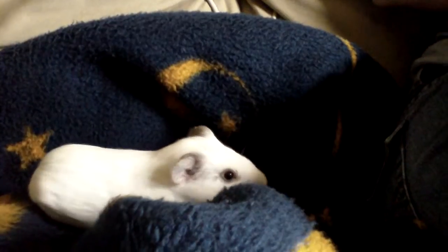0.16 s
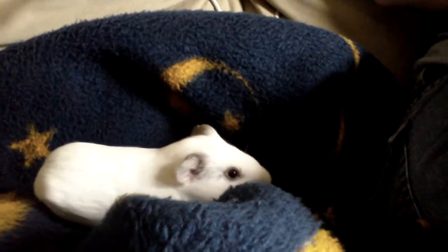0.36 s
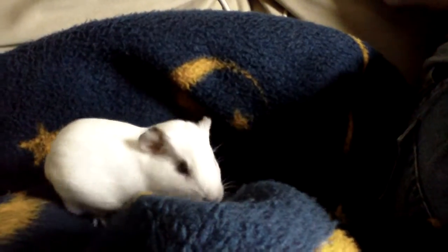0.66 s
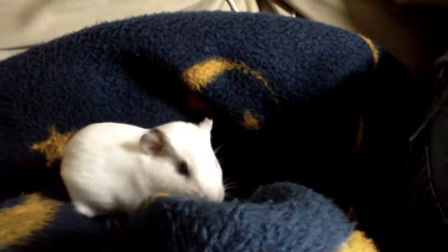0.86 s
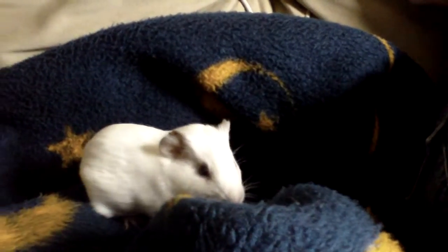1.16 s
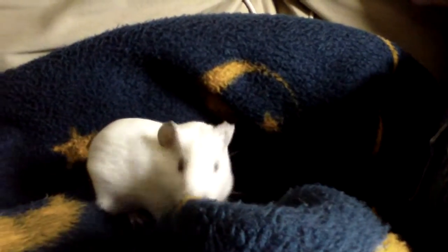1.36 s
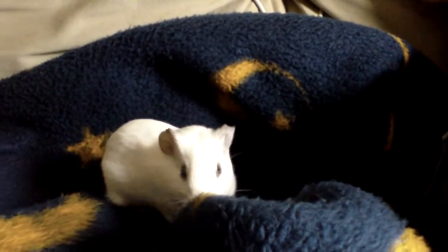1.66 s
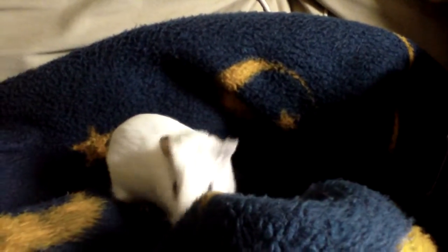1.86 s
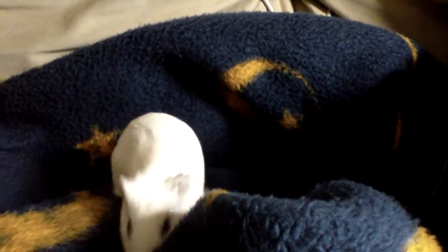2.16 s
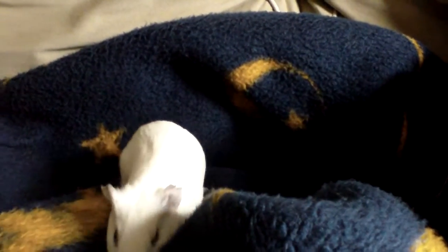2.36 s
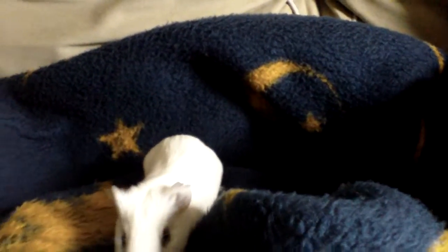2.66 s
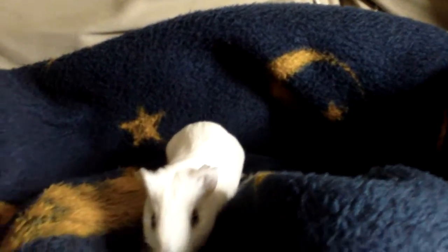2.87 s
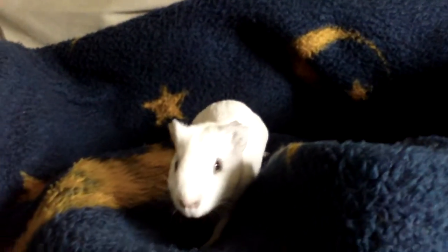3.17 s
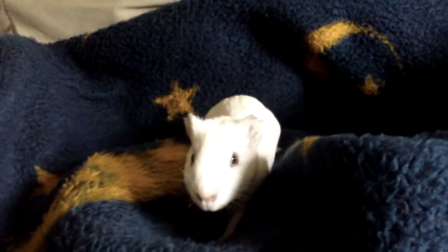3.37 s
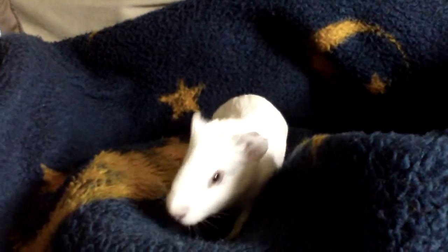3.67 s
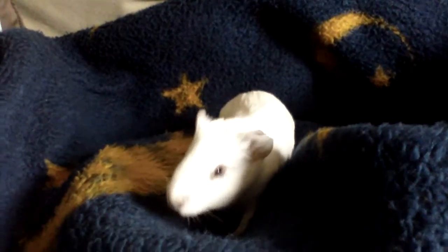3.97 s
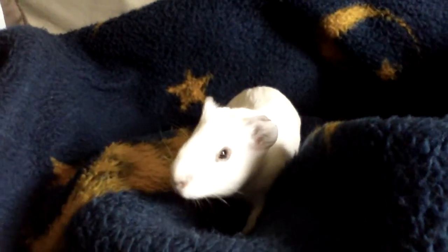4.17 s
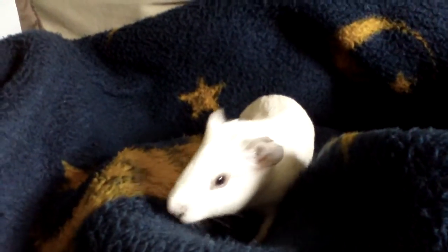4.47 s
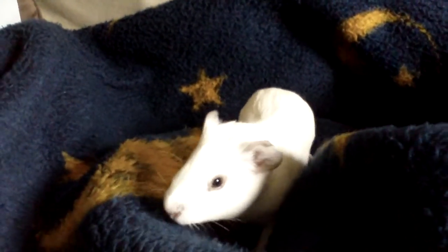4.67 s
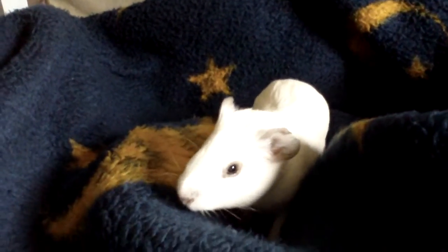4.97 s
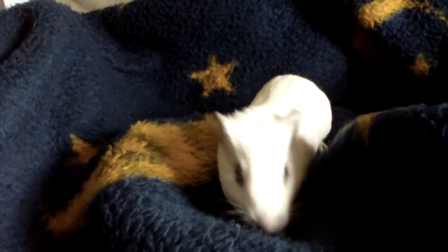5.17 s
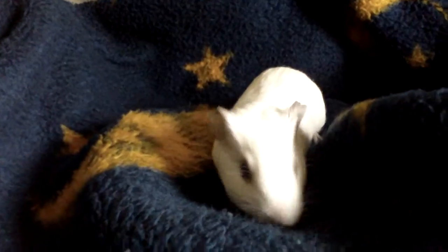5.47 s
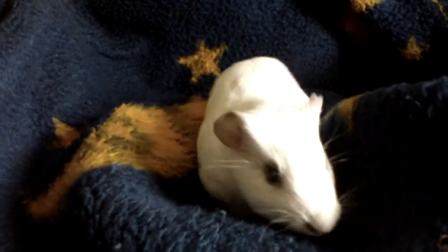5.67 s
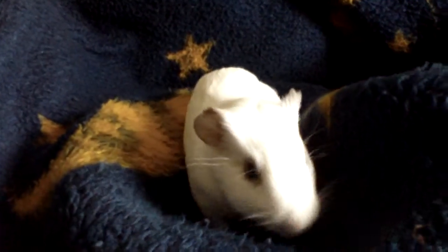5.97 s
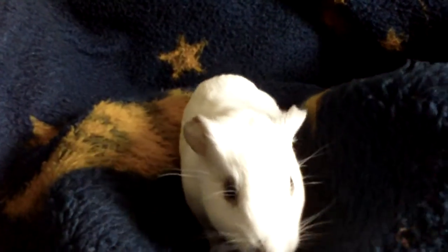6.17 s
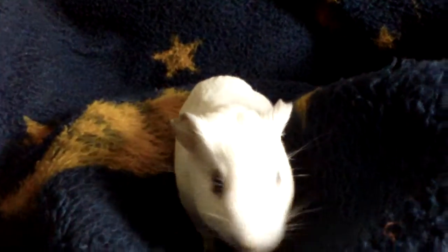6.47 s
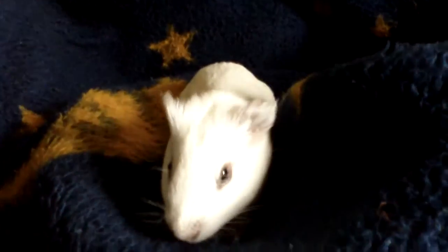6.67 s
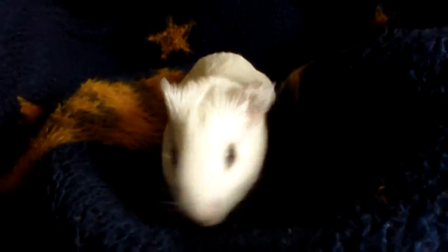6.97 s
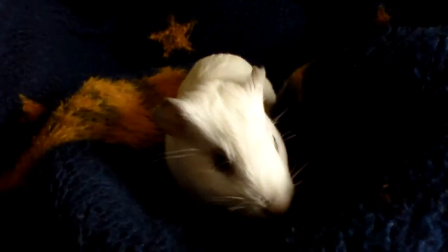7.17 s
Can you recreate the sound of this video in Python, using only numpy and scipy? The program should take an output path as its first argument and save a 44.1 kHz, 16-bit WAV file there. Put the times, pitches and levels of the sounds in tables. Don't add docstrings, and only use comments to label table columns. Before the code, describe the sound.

A guinea pig chirps softly on a fleece in a quiet room, while cloth scuffs and sharp knocks sound on the camera case midway.

```python
import sys
import numpy as np
from scipy import signal
from scipy.fft import rfft, irfft, next_fast_len
from scipy.io import wavfile
from scipy.ndimage import uniform_filter1d, map_coordinates

SR = 44100
rng = np.random.default_rng(int(sys.argv[2]) if len(sys.argv) > 2 else 0)


def convert_level_to_amplitude(level_db):
    exponent = np.asarray(level_db, float) / 20
    return 10 ** exponent


def unload_wav(signal):
    wavfile.write(
        sys.argv[1],
        SR,
        np.round(np.clip(np.atleast_2d(signal).T, -1, 1) * 32767).astype(np.int16),
    )


N = 322355

# pitch_hz, width_hz, level_db
LOW_SHELL = [(1086, 238, 1), (2137, 255, -2), (3160, 510, -4.5)]
# pitch_hz, width_hz, level_db
HIGH_SHELL = [(1697, 440, 9), (3396, 310, -4)]
# pitch_hz, level_db (per Hz)
LOOSE_PARTS = [(120, -47), (200, -5.5), (696, -3), (1040, -4), (1570, 2), (2130, 1), (2650, -12),
               (3350, -5), (5260, -15), (7830, -14.5), (8880, -20), (9900, -18), (15000, -43)]


def unit(x):
    return x / np.sqrt(np.mean(x ** 2) + 1e-20)


def along(points, hz):
    f, v = np.transpose(points)
    return np.interp(np.log(hz + 1), np.log(f + 1), v)


def wobble(rate):
    knots = rng.standard_normal(int(N * rate / SR) + 4)
    return map_coordinates(knots, [np.arange(N) * rate / SR])


def filtered(x, response):
    m = next_fast_len(N + 8192)
    return irfft(rfft(x, m) * response(np.fft.rfftfreq(m, 1 / SR)), m)[..., :N]


def span(first_s, last_s):
    at = np.arange(round(first_s * SR), min(round(last_s * SR), N))
    nearest_end = np.minimum(at - at[0], at[-1] - at)
    return at, np.minimum(1, nearest_end / (0.0025 * SR))


def room():
    # pitch_hz, level_db (per Hz)
    hush_curve = [(30, -23), (60, -18.5), (100, -16), (160, -6), (300, -2), (480, 0), (1100, 3), (1500, -2),
                  (3200, -5.5), (5000, -9.5), (6500, -6), (8700, -10.5), (9400, -13.5), (15500, -16)]
    # pitch_hz, likeness (1 = the same)
    alike = [(60, 0.99), (250, 1), (640, 0.93), (1400, 0.91), (3100, 0.71), (8000, 0.91), (15000, 0.41)]
    tone_hz = [242.4, 484, 7867, 12408]
    # level_db (rms), phase_wander_turns
    tones = [
        (-75.5, 0.13),
        (-79, 0.5),
        (-64.5, .02),
        (-84, 0.022),
    ]

    def mid_and_side(hz):
        turn = np.arccos(np.clip(along(alike, hz), -1, 1)) / 2
        return convert_level_to_amplitude(along(hush_curve, hz)) * np.array([np.cos(turn), np.sin(turn)])

    mid, side = filtered(rng.standard_normal((2, N)), mid_and_side)
    hush_db = -60.5 + 0.35 * wobble(1.29) + 0.28 * wobble(12)
    out = convert_level_to_amplitude(hush_db) * unit(np.array([mid + side, mid - side]))
    t = np.arange(N) / SR
    for hz, (db, wander) in zip(tone_hz, tones):
        level = np.sqrt(2) * convert_level_to_amplitude(db + 0.26 * wobble(2.96))
        out = out + level * np.sin(2 * np.pi * (hz * t + wander * wobble(6)))
    return out


def voice(at, hz, level, effort_db, tremor, flutter):
    # pitch_hz, level_db
    throat = [(650, -5), (850, 1), (1100, 1), (1400, 7.5), (1620, 3.5), (1800, -8), (2350, -0.5),
              (3400, -8.5)]
    partials_db = [0, -8, -10, -10]
    # time_s, level_db
    facing = [(2, -4), (5.6, 0.5)]
    phase = 2 * np.pi * np.cumsum(hz * (1 + 0.01 * tremor[at])) / SR
    facing_db = np.interp(at[0] / SR, *np.transpose(facing))
    effort_lift_db = 0.97 * (effort_db + 58.5)
    lift_db = [0, effort_lift_db, effort_lift_db + facing_db, effort_lift_db + facing_db]
    tone = np.zeros(len(at))
    for k, db in enumerate(partials_db):
        partial_db = db + lift_db[k] + along(throat, (k + 1) * hz)
        tone -= convert_level_to_amplitude(partial_db) * np.cos((k + 1) * phase)
    return np.sqrt(2) * level * convert_level_to_amplitude(1.5 * flutter[at]) * tone


def rodent():
    # start_s, length_s, first_pitch_hz, last_pitch_hz, level_db
    chirps = [(0.0, 0.026, 713, 716, -57.5), (0.509, 0.057, 643, 930, -61), (1.063, 0.078, 733, 770, -60),
              (1.384, .052, 697, 1010, -61.5), (1.46, .018, 1060, 1100, -60),
              (1.474, 0.025, 1080, 1076, -58), (1.657, 0.045, 746, 790, -66.5),
              (1.903, .024, 790, 795, -61), (1.93, 0.041, 762, 760, -63), (5.201, 0.046, 750, 1003, -60.5),
              (5.64, .025, 810, 910, -64), (6.221, 0.0386, 698, 825, -57), (6.631, .022, 760, 780, -65)]
    # time_s, pitch_hz, effort_db
    long_calls = [
        [(0.16, 662, -61), (0.188, 742, -56.5), (0.22, 740, -56.5), (0.234, 802, -55), (0.246, 837, -62.5),
         (0.282, 760, -56.5), (0.292, 770, -76)],
        [(0.745, 705, -55.5), (0.773, 815, -58), (0.807, 901, -58), (0.839, 1097, -63), (0.857, 1440, -58),
         (0.883, 1290, -57.5), (0.91, 1650, -62)],
        [(5.817, 780, -60), (5.831, 718, -56.5), (5.841, 735, -56.5), (5.856, 815, -56), (5.866, 830, -58),
         (5.875, 840, -66)],
    ]
    attack_s, release_s = 0.0069, 0.01
    glide_bend = 1.52
    hook_hz, hook_s = 30, 0.0044
    out, tremor, flutter = np.zeros(N), wobble(90), wobble(110)
    for s, length, first_hz, last_hz, db in chirps:
        at, _ = span(s, s + length)
        t = (at - at[0]) / SR
        rise = t / attack_s + (s == 0)
        swell = np.clip(np.minimum(rise, (length - t) / release_s), 0, 1)
        glide_hz = first_hz + (last_hz - first_hz) * (t / length) ** glide_bend
        hz = glide_hz + hook_hz * np.exp(-t / hook_s)
        out[at] += voice(at, hz, convert_level_to_amplitude(db) * swell, db, tremor, flutter)
    for s, hz, db in map(np.transpose, long_calls):
        at, fade = span(s[0], s[-1])
        level = fade * convert_level_to_amplitude(np.interp(at / SR, s, db))
        out[at] += voice(at, np.interp(at / SR, s, hz), level, np.median(db), tremor, flutter)
    return out


def shell(modes):
    def response(f):
        total = 0
        for k, (centre, width, db) in enumerate(modes):
            drive = 1j * f * width
            total = total + (-1) ** k * convert_level_to_amplitude(db) * drive / (centre * centre - f * f + drive)
        return total
    return response


def fibres(lumpy_db):
    return rng.standard_normal(N) * convert_level_to_amplitude(lumpy_db * wobble(700) + 1.5 * wobble(120))


def steady(x):
    power = np.abs(uniform_filter1d(x ** 2, size=260))
    return unit(x / np.sqrt(power + 0.37 * np.mean(x ** 2)))


def rubbed_case():
    # pitch_hz, level_db (per Hz)
    hiss_curve = [(1200, -30), (2400, -5), (3000, -8), (4050, -4), (4500, -12), (5350, 0), (7500, -11),
                  (9400, -22), (15000, -34)]
    # pitch_hz, width_hz, level_db
    hollow_modes = [(340, 56, 4), (635, 760, -6)]
    low = steady(filtered(fibres(lumpy_db=4.5), lambda hz: shell(LOW_SHELL)(hz) ** 2))
    high = steady(filtered(fibres(lumpy_db=3.5), lambda hz: shell(HIGH_SHELL)(hz) ** 2))
    hiss = unit(filtered(fibres(lumpy_db=2), lambda hz: convert_level_to_amplitude(along(hiss_curve, hz))))
    hollow = unit(filtered(fibres(lumpy_db=-6), shell(hollow_modes)))
    return low, high, hiss, hollow


def rubbing():
    # peak_s, rise_s, fall_s, level_db, low_shell_db
    scuffs = [(0.236, 0.016, .022, -42.5, -10), (0.862, .011, 0.013, -50, -6),
              (1.915, 0.019, .018, -50.5, -5.5), (2.237, 0.012, 0.013, -51.5, -2.5),
              (2.316, .014, .017, -54.5, -6), (2.37, 0.006, 0.028, -45.5, -19),
              (2.418, 0.0051, 0.098, -49, -9), (2.508, 0.018, 0.02, -47.5, -4)]
    # peak_s, rise_s, fall_s, level_db, low_shell_db
    drags = [(2.53, 0.0068, 0.063, -60, 4), (2.61, .03, .055, -61, 8), (3.759, .004, .045, -57.5, 2.5),
             (4.101, 0.033, 0.012, -53, -5), (4.264, .014, 0.0039, -51, -8)]
    # peak_s, rise_s, fall_s, level_db, low_shell_db
    wipes = [(3.667, 0.015, 0.038, -57, -10), (3.818, .008, 0.016, -65, -2),
             (3.876, 0.0042, 0.064, -56.5, 0.5), (3.945, .01, .048, -51, 0),
             (4.008, 0.012, 0.063, -57.5, 5), (4.42, 0.055, 0.08, -60, -4), (4.581, 0.028, 0.023, -62.5, 1),
             (4.613, 0.025, 0.0032, -55, -6), (4.647, 0.022, 0.038, -54, -15),
             (4.744, 0.038, 0.018, -57.5, -7), (4.781, 0.035, 0.019, -58.5, -6)]
    # peak_s, rise_s, fall_s, level_db, low_shell_db
    scrapes = [
        (4.31, .022, 0.029, -45.5, 4),
        (4.343, 0.026, 0.026, -39.5, -3.5),
    ]
    # dry_hiss_db, hollow_db, loose_parts_db, rise_depth_db, fall_depth_db
    grips = [
        (-16, -8, -14, 15, 15),
        (-6.5, -5, -23, 11, 4.5),
        (0, -8, -23, 4.5, 4),
        (-19, -16, -5.5, 7.5, 13.5),
    ]
    out = np.zeros(N)
    low, high, hiss, hollow = rubbed_case()
    loose = unit(filtered(fibres(lumpy_db=-8), lambda hz: convert_level_to_amplitude(along(LOOSE_PARTS, hz)) * hz / (hz + 5000)))
    for strokes, grip in zip([scuffs, drags, wipes, scrapes], grips):
        hiss_db, hollow_db, loose_db, rise_db, fall_db = grip
        for s, rise, fall, db, low_db in strokes:
            at, fade = span(s - rise, s + fall)
            press_db = np.interp(at / SR, [s - rise, s, s + fall], [db - rise_db, db, db - fall_db])
            parts = high[at] + convert_level_to_amplitude(low_db + 1.5) * low[at] + convert_level_to_amplitude(hiss_db) * hiss[at]
            parts += convert_level_to_amplitude(hollow_db) * hollow[at] + convert_level_to_amplitude(loose_db) * loose[at]
            out[at] += fade * convert_level_to_amplitude(press_db) * parts
    return out


def ticks():
    tick_times = [2.5035, 2.6918, 3.6331, 3.7404, 4.6183, 4.6273, 4.632]
    # peak_db, ring_hz, push_db and crack_db (over the peak)
    tick_table = [(-47, 1750, -20, 3), (-35.5, 1950, -30, -5), (-17.5, 1740, -13, -8),
                  (-26.5, 1720, -2, -22), (-45, 1700, -8, 5), (-40, 1644, -10, 5.5), (-47, 1700, -10, 6)]
    # peak_db, t60_s
    ring_times = [(-36, .013), (-28, .007)]
    bright_curve = [(2500, -4), (6500, -2.5), (10000, -16), (14000, -42)]  # pitch_hz, level_db
    bounce_s, bounce_db = 0.0017, -6
    out, t = np.zeros(N), np.arange(SR // 32) / SR
    bright = unit(filtered(rng.standard_normal(N), lambda hz: convert_level_to_amplitude(along(bright_curve, hz))))
    after = unit(filtered(rng.standard_normal(N), shell(HIGH_SHELL)))
    for s, (db, hz, push_db, crack_db) in zip(tick_times, tick_table):
        t60 = np.interp(db, *np.transpose(ring_times))
        at = round(s * SR) + np.arange(len(t))
        ring = -np.sin(2 * np.pi * hz * t)
        ring -= 0.914 * np.sin(2 * np.pi * 1.331 * hz * t)
        ring += 0.45 * np.sin(2 * np.pi * 1.793 * hz * t)
        push = convert_level_to_amplitude(push_db) * np.sin(2 * np.pi * 620 * t)
        crack = convert_level_to_amplitude(crack_db - 60 * t / 0.096) * bright[at]
        tail = convert_level_to_amplitude(-16.5 - 60 * t / 0.018) * after[at]
        onset = 1 - np.exp(-t / 0.00018)
        out[at] += convert_level_to_amplitude(db) * onset * (convert_level_to_amplitude(-60 * t / t60) * (ring + push + crack) + tail)
    return out + convert_level_to_amplitude(bounce_db) * np.roll(out, round(bounce_s * SR))


def knocks():
    knock_times = [2.6393, 3.8573, 3.958, 4.0517, 4.1158, 4.163, 4.2131, 4.223, 4.2765, 4.6148]
    # peak_db, blow_hz, overtone_db and rattle_db (over the peak), rattle_length_s
    knock_table = [(-37, 1100, -12, -22, 0.014), (-26.5, 1370, -31, -23, 0.039),
                   (-49, 356, -20, -18, 0.012), (-13, 1080, -12.5, -17, 0.014),
                   (-17, 1000, -26, -17.5, 0.033), (-13.5, 1130, -22, -18.5, 0.026),
                   (-27.5, 3100, -23, -7, 0.014), (-32.5, 1250, -10, -3, 0.0244),
                   (-20.5, 1140, -31, -13, 0.064), (-37, 900, -20, -12, 0.0081)]
    thump_db, thump_grows = -19.5, 0.77
    jolt_db, jolt_s = -30, 0.0025
    out, t = np.zeros(N), np.arange(SR // 16) / SR
    loose = unit(filtered(fibres(lumpy_db=1.5),
                          lambda hz: convert_level_to_amplitude(along(LOOSE_PARTS, hz)) * (0.5 + shell(LOW_SHELL)(hz))))
    for s, (db, hz, overtone_db, rattle_db, length) in zip(knock_times, knock_table):
        at = round(s * SR) + np.arange(len(t))
        soft = 1 - np.exp(-(t / 0.00072) ** 2)
        stop = np.exp(-(t / length) ** 4)
        blow = -np.sin(2 * np.pi * hz * t) * np.exp(-t * hz / 1.92)
        overtone = convert_level_to_amplitude(overtone_db) * np.sin(2 * np.pi * 1.9884 * hz * t) * np.exp(-t * hz / 9) * stop
        thump_level = convert_level_to_amplitude(thump_db - (1 - thump_grows) * db - 60 * t / 0.089)
        thump = -np.sin(2 * np.pi * 324 * t) * thump_level * np.exp(-(t / 0.019) ** 4)
        body = np.sin(2 * np.pi * 600 * t) * convert_level_to_amplitude(-18 - 60 * t / 0.017)
        rattle = convert_level_to_amplitude(rattle_db - 60 * t / 0.12) * stop * (1 - np.exp(-t / 0.0011)) * loose[at]
        jolt = convert_level_to_amplitude(jolt_db) * t / jolt_s * np.exp(1 - t / jolt_s)
        out[at] += convert_level_to_amplitude(db + 4.5) * soft * (blow + overtone + thump + rattle + body + jolt)
    return out


def scene():
    def thin(hz):
        return 0.082 + 0.81 * (1j * hz / (200 + 1j * hz)) ** 2

    return room() + rodent() + filtered(rubbing() + ticks() + knocks(), thin)


def roll_off(x):
    return signal.sosfilt(signal.butter(12, 15700, fs=SR, output="sos"), x)


def record(dry):
    mix = filtered(dry, lambda hz: hz < 15300)
    return roll_off(mix)


dry = scene()
out = record(dry)
unload_wav(out)
```